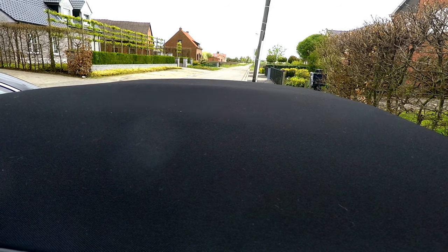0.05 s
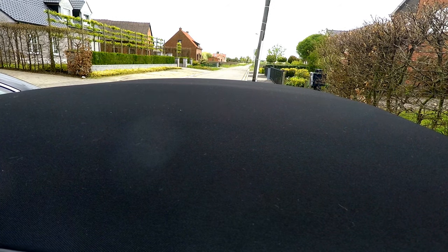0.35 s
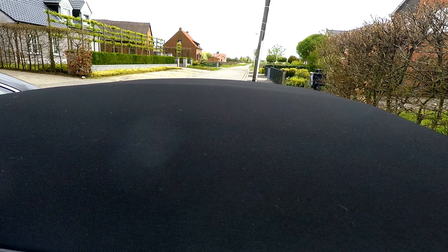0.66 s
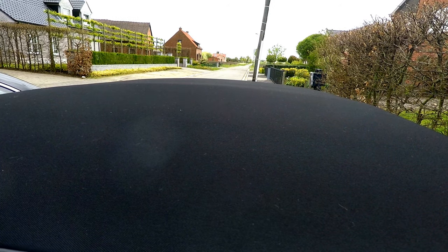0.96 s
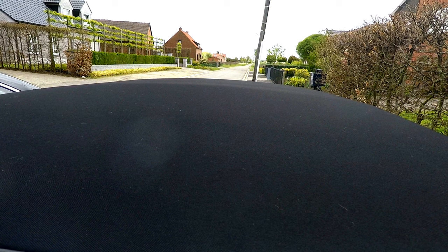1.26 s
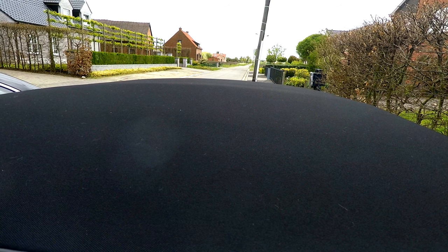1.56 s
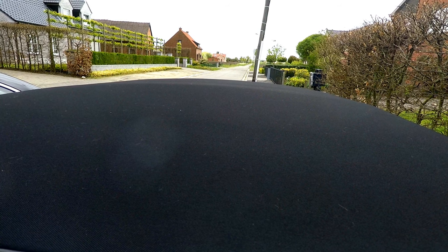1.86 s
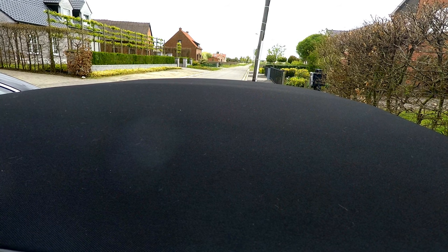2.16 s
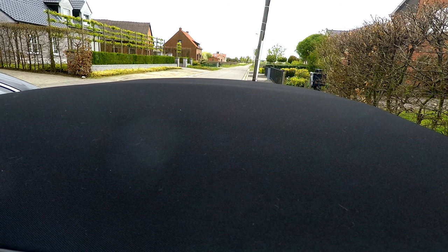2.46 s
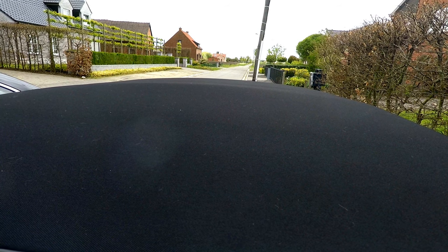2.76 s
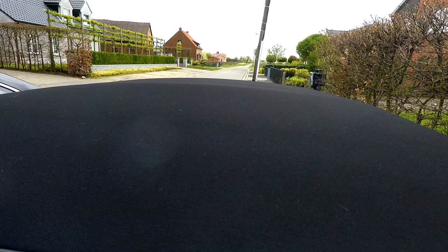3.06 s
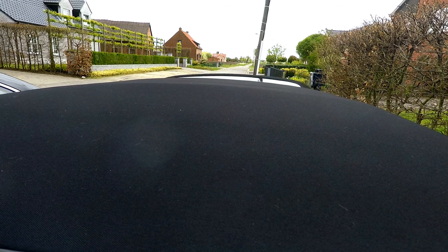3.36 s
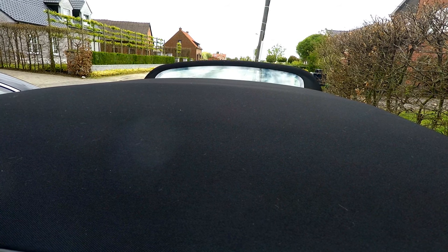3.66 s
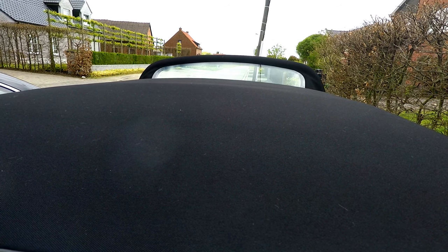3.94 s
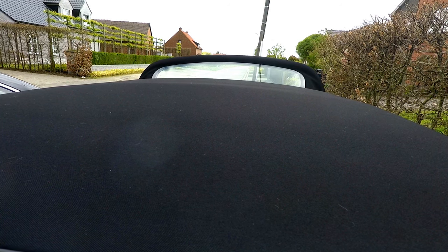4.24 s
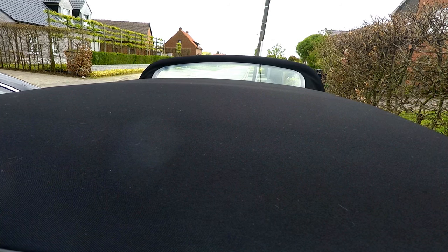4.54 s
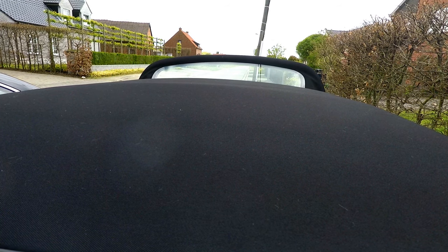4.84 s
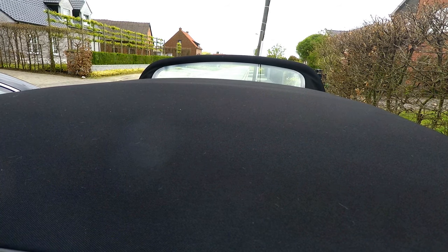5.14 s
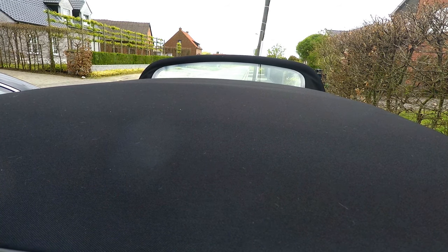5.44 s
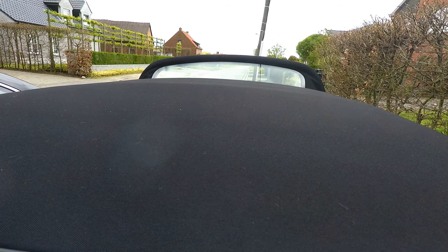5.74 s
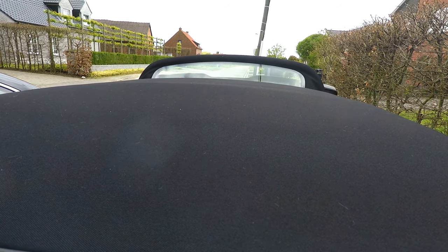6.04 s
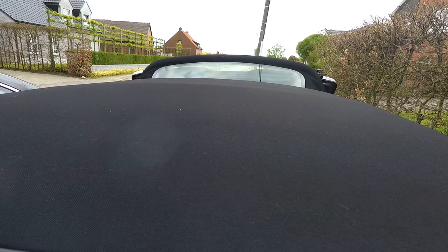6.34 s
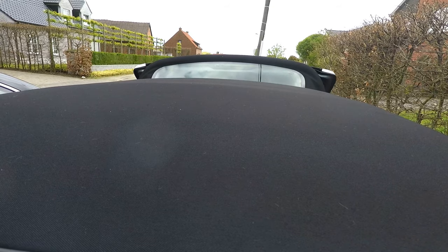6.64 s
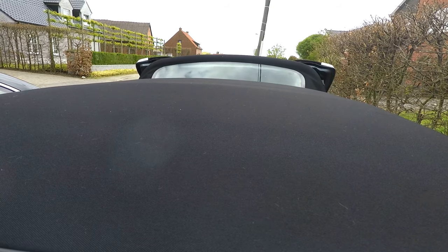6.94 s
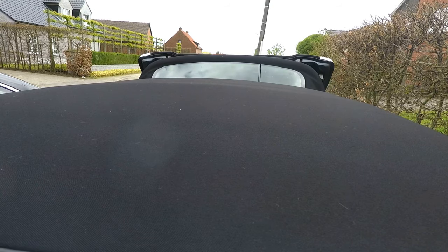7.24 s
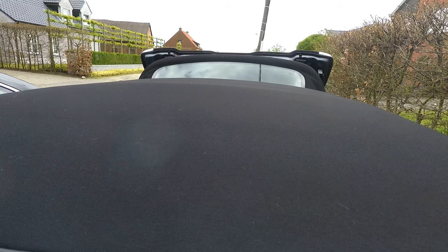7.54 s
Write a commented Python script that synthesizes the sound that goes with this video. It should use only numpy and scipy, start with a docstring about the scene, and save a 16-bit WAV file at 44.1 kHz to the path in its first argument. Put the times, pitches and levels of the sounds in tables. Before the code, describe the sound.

A convertible idles in a quiet street, heard close from its body as a low, pulsing exhaust boom with a steady whirr. The powered soft top unlatches with a sharp snap and heavy thumps, then another thump. Midway the rubber seal peels free with a hiss and short squeak, followed by more clicks and knocks. Light wind buffets the microphone, and small birds chirp in the hedges, with a farther trill near the end.

```python
"""A convertible idles as its powered soft top starts to open, heard from its body in a quiet street.
Close by, the exhaust booms, latches thump the panels and the linkage clicks and knocks; then the roof
peels off its rubber seal with a squeak. A breeze buffets the microphone and small birds sing in the
hedges, echoing off house fronts. The limiter ducks after the first thump and slowly recovers."""
import sys
import numpy as np
from scipy import signal
from scipy.fft import rfft, irfft
from scipy.io import wavfile
from scipy.ndimage import uniform_filter1d

SR = 44100
rng = np.random.default_rng(int(sys.argv[2]) if len(sys.argv) > 2 else 0)


def pcm_store(signal):
    """Save signal as 16-bit PCM."""
    levels = np.round(np.clip(np.atleast_2d(signal), -1, 1) * 32767)
    wavfile.write(sys.argv[1], SR, levels.astype(np.int16).T)


N = 339570
TIME = np.arange(N) / SR

FIRING_HZ = 24.84
# The exhaust boom. Each row: time in seconds, level in dB.
EXHAUST_BOOM = [(0.1, -17.5), (.65, -12), (1.35, -13), (1.9, -21), (2.18, -14), (2.38, -23.5), (2.6, -16.5),
                (2.78, -26.5), (3.55, -24), (4.3, -17.5), (4.8, -20), (5.0, -22.5), (6.08, -27.5),
                (6.26, -22.5), (7.1, -19), (7.7, -22.5)]
# Engine overtones. Each row: multiple of the firing rate, level in dB.
ENGINE_ORDERS = [(2, -33.5), (3, -43.5), (4, -46.5), (5, -42), (5.5, -42.5), (6, -40), (7, -48.5),
                 (7.5, -47.5), (8, -42), (9, -46), (10, -54), (13, -48.5), (16, -50)]
# Fan and pump tones. Each row: pitch in Hz, level in dB.
FAN_AND_PUMP = [(57.5, -43.5), (214.3, -40), (428.6, -46), (926, -57), (1135, -60.5), (1603, -62.5)]


def engine(firings):
    """A four-cylinder idle up close: exhaust pulses boom under wavering overtones, fan and pump."""
    boom_db, = curves(EXHAUST_BOOM)
    # the boom sits to the right, less so as it swells, and drifts slowly further right
    lean_db = -6 + 0.4 * (boom_db + 21.5) - 0.3 * TIME
    sides_db = np.array([lean_db, -lean_db]) / 2
    out = tone(2 * np.pi * firings, lag=0.3) * amp(boom_db + 0.5 * walk(7.6) + sides_db)
    overtones = [(order * FIRING_HZ, db) for order, db in ENGINE_ORDERS]
    for hz, db in [*overtones, *FAN_AND_PUMP]:
        cycles = firings * hz / FIRING_HZ + rng.random()
        phase = 2 * np.pi * cycles + (0.17 + hz / 1500) * walk(12)
        out += tone(phase, lag=hz / 200) * amp(db + 3.07 * walk(6))
    return out


# Pump strokes. Each row: start, rise and settling time in seconds, extra rumble and whirr in dB.
PUMP_STROKES = [(0.19, 0.44, 1.63, 3.5, 3.5), (3.85, 0.19, 2.2, 2.5, 2), (5.6, 0.78, 3, -1, 1)]
# Spectra of the running machinery. Each row: frequency in Hz, relative level in dB.
RUMBLE_SPECTRUM = [(20, -16), (40, -10), (65, 11), (95, 1), (135, 7.5), (180, 8), (240, 7.5), (290, 1.5),
                   (400, -4), (600, -39.5), (9500, -39), (13000, -43)]
WHIRR_SPECTRUM = [(200, -42), (380, 1.5), (540, 2), (700, -1.5), (800, -6.5), (920, -3), (1200, -6.5),
                  (1680, -5.5), (1900, -12.5), (2250, -12), (2900, -17.5), (3800, -17), (5400, -21.5),
                  (6500, -28), (8500, -35), (10500, -32.5), (13000, -99)]


def machinery(firings):
    """Body rumble and a whirr with fine valve ticking pulse with the firings and follow the pump's load."""
    rumble_db, whirr_db = -36, -40
    for start, rise, settle, more_rumble_db, more_whirr_db in PUMP_STROKES:
        age = TIME - start
        load = np.clip(age / rise, 0, 1) * np.exp(-np.maximum(age - rise, 0) / settle)
        rumble_db += more_rumble_db * load
        whirr_db += more_whirr_db * load
    beat = np.cos(2 * np.pi * firings)
    rumble = spread(noise() * amp(0.21 * beat + 2.8 * walk(28)), RUMBLE_SPECTRUM)
    ticking = amp(0.95 * beat + 1.4 * walk(330) + 0.87 * walk(14))
    whirr = spread(noise() * ticking, WHIRR_SPECTRUM)
    return rumble * amp(rumble_db) + whirr * amp(whirr_db)


# Body panel modes. Each row: pitch in Hz, relative level in dB, t60 in seconds, right lag in radians.
PANEL_MODES = [(31, -4, .5, 2), (41.6, -18, .3, -10), (73.3, -9, 0.78, 6.5), (104.5, -8, 0.24, 2.5),
               (137, -3, 0.37, 1.58), (167.4, -3.5, 0.31, 1), (186.7, 1.5, 0.26, 0.96),
               (212, -2.5, 0.26, 1), (235.5, -2.5, 0.25, 1.22), (247.9, -6.5, 0.32, 1),
               (294, -8, 0.12, 2.5), (327.2, -2, 0.13, 1.8), (377, -8.5, 0.13, 2), (462.4, -0.5, 0.13, 3.5),
               (506, -8.5, 0.16, 3.5), (634, -12, 0.11, 3.5), (800, -15, 0.13, -3)]
# Blows of latches and linkage. Each row: start in seconds, peak of the ring in dB,
# most strongly driven pitch in Hz, extra damping per second, contact time in seconds.
BLOWS = [(.146, -1, 514, 28, 0.0022), (.147, -3.5, 60, 4.3, 0.011), (.156, 3.5, 242, 1.6, 0.0054),
         (.19, 6.5, 141, 39, 0.00099), (.229, 2.5, 228, 32, 0.0019), (.264, 5.5, 240, 21, 0.0034),
         (.287, -5, 250, 33, 0.0027), (.398, -24, 430, 9.2, .005), (.495, -18, 207, 7.3, 0.0066),
         (.79, 1.5, 178.5, 12, 0.0069), (.789, -8.5, 620, 35, 0.007), (1.659, -19.5, 215, 3.8, 0.0082),
         (1.74, -18, 240, 2.8, 0.0064), (1.854, -16.5, 250, 12, 0.0043), (2.19, -19, 130, 5, 0.0033),
         (2.43, -21, 138, 9.1, 0.0046), (3.573, -24.5, 179, 8, 0.0055), (3.635, -22.5, 262, 8, 0.0076),
         (4.439, -19, 70, 4.3, 0.005), (4.525, -19, 243, 18, 0.0052), (4.855, -22, 400, 29, 0.0022),
         (4.874, -19, 560, 8, .006), (4.885, -13, 85, 16, .003), (4.886, -4.5, 189, 37, 0.0025),
         (4.945, -15.5, 124, 5.8, 0.0068), (4.988, -13, 206, 17, 0.0038), (5.057, -22, 430, 30, .003),
         (5.064, -16.5, 260, 10, 0.0054), (5.09, -15, 540, 19, .004), (5.093, -5.5, 255, 17, 0.0039)]
# The dull thud of a blow. Each row: frequency in Hz, relative level in dB.
THUD_SPECTRUM = [(40, -0.5), (90, -1), (170, -9.5), (240, 7.5), (330, -0.5), (400, -7.5), (470, -2.5),
                 (560, -12), (700, -21.5), (1200, -34), (2500, -28), (8000, -83)]


def panel_thumps():
    """Each blow rings the panel modes near its own pitch and shakes fabric and trim into a dull thud."""
    out, shake, t = np.zeros((2, N)), np.zeros(N), TIME[:SR // 2]
    mode_hz = np.array(PANEL_MODES)[:, 0]
    modes = np.array([mode(t, hz, db, t60, lag) for hz, db, t60, lag in PANEL_MODES])
    for start, db, hz, damping, contact in BLOWS:
        share = 1 / (1 + (np.log2(mode_hz / hz) / 0.39) ** 2)
        # a padded blow builds up slowly, a hard one at once
        push = (1 - np.exp(-(t / contact) ** 2)) * np.exp(-damping * t)
        ring = np.tensordot(share, modes, 1) * push * (1 - np.exp(-t / 0.0041))
        add(out, start, amp(db) * ring / np.abs(ring).max())
        add(shake, start, amp(db - 17.5) * np.exp(-22 * t) * push)
    return out + spread(noise(), THUD_SPECTRUM) * shake


# The flap of the freed roof: start in seconds, length in seconds, level in dB.
ROOF_FLAP = (0.22, 0.17, -3)


def roof_flap(firings):
    """The loosened roof swings through a few slow, strong cycles at the firing rate."""
    start, length, db = ROOF_FLAP
    return tone(2 * np.pi * firings, lag=.14) * amp(db) * swell(start, length)


# Latch hooks snapping over. Each row: start in seconds, peak in dB.
HOOK_SNAPS = [(.1545, -30), (0.1616, -5.5), (.1945, -22), (.2245, -23), (0.233, -21), (.2362, -23),
              (4.8484, -21), (4.8554, -15), (4.8975, -21), (5.091, -31), (5.1, -24.5), (5.1055, -26),
              (5.361, -25.5)]
# Modes of a hook. Each row: pitch in Hz, relative level in dB, t60 in seconds.
HOOK_MODES = [(720, -5, 0.011), (1130, -4, 0.0096), (1600, -6.5, 0.0081), (2050, -3.5, 0.0089),
              (2920, -3, 0.0057), (3720, 1.5, 0.0081), (4390, -1.5, 0.0064), (5800, -15, .004),
              (7540, -18, .003)]


def latch_hooks():
    """Steel snaps on steel and rings the hook for a few milliseconds, never twice quite alike."""
    out, t = np.zeros((2, N)), TIME[:SR // 20]
    for start, db in HOOK_SNAPS:
        ring = 0
        for hz, mode_db, t60 in HOOK_MODES:
            detune, skew, stray = rng.standard_normal(3)
            ring += mode(t, hz * (1 + 0.041 * detune), mode_db + 0.9 * stray, t60, lag=1.96 * skew)
        ring *= 1 - np.exp(-t / .0003)
        add(out, start, amp(db) * ring / np.abs(ring).max())
    return out


# Cracks of the joints. Each row: start in seconds, level in dB, decay time in seconds.
JOINT_CRACKS = [(.146, -25, .002), (0.154, -21, .002), (.165, -23, 0.013), (0.194, -19.5, 0.0099),
                (0.235, -19.5, 0.004), (0.263, -24, 0.0027), (3.942, -30.5, 0.019), (4.134, -46, .005),
                (4.282, -44, 0.0064), (4.408, -31.5, 0.021), (4.672, -35, 0.024), (4.847, -29, 0.0037),
                (4.8552, -25, .004), (4.882, -33, 0.005), (4.945, -44, .003), (4.971, -35.5, .005),
                (5.059, -31, 0.007), (5.456, -37, .003), (5.603, -33.5, 0.015), (5.931, -38, 0.0037)]
# Their spectrum. Each row: frequency in Hz, relative level in dB.
CRACK_SPECTRUM = [(300, 4), (650, 3.5), (900, 0.5), (1600, 0), (2500, -7), (3100, -10.5), (4000, -9),
                  (5200, -14), (6500, -20.5), (9000, -30), (13000, -49)]


def linkage_clicks():
    """The joints give short gritty cracks, each with a faint rattle behind it."""
    strength, t = np.zeros(N), TIME[:SR // 4]
    rattle = amp(-18) * np.exp(-t / 0.072)
    for start, db, decay in JOINT_CRACKS:
        add(strength, start, amp(db) * (np.exp(-t / decay) + rattle))
    return spread(noise(), CRACK_SPECTRUM) * uniform_filter1d(strength, size=24)


# The seal coming unstuck: start in seconds, level in dB, decay time in seconds.
SEAL_RELEASE = (3.942, -29.5, 0.014)
# Creaks where the rubber grips. Each row: start in seconds, length in seconds, level in dB.
SEAL_CREAKS = [(3.997, 0.092, -35), (4.132, 0.028, -36), (4.201, 0.026, -28), (4.281, 0.028, -30.5),
               (4.395, .04, -45)]
# Spectra of the seal's hiss, rasp and slips. Each row: frequency in Hz, relative level in dB.
HISS_SPECTRUM = [(1500, -30), (2800, -18), (3900, 7), (5000, 0), (6500, -8), (8500, -20), (11000, -34.5),
                 (13000, -50)]
RASP_SPECTRUM = [(500, -23), (850, -16), (1100, 8), (1300, 0), (1550, 13), (1850, -1), (2500, -13),
                 (3250, -12), (4200, -11), (10000, -50)]
SLIP_SPECTRUM = [(400, -32), (700, -4), (900, 5.5), (1080, -9), (1250, 0), (1550, 4.5), (1750, -3),
                 (1950, -2.5), (2750, -11.5), (3500, -4.5), (5000, -9.5), (6500, -19.5), (8000, -27),
                 (10000, -43), (13000, -56)]


def seal_peel():
    """Rubber comes unstuck with a hiss, then lets go in tiny slips and rasping creaks."""
    peel_db, hold_s, fade_db_per_s = -41.5, 0.41, 43
    start, db, decay = SEAL_RELEASE
    release = np.zeros(N)
    add(release, start, amp(db) * np.exp(-TIME / decay) * (1 - np.exp(-TIME / 0.0013)))
    hiss = spread(noise(), HISS_SPECTRUM) * release
    fade_db = fade_db_per_s * np.maximum(TIME - start - hold_s, 0)
    peel = (TIME > start) * amp(peel_db - fade_db + 2.8 * walk(35))
    grip = sum(amp(level) * np.sqrt(swell(onset, length)) for onset, length, level in SEAL_CREAKS)
    rasp = spread(noise() * amp(2.0 * walk(380)), RASP_SPECTRUM)
    slips = spread(noise() * amp(2.3 * walk(420)), SLIP_SPECTRUM)
    return hiss + slips * peel + rasp * grip


# The course of the squeak. Each row: time in seconds, pitch in Hz, level in dB.
SQUEAK_PATH = [(4.118, 1724, -62), (4.137, 1707, -33), (4.155, 1717, -45), (4.186, 1666, -24.5),
               (4.205, 1663, -38), (4.225, 1663, -33), (4.255, 1660, -72), (4.28, 1670, -58),
               (4.293, 1670, -30), (4.325, 1650, -55)]
# Its partials. Each row: ratio to the pitch, relative level in dB.
SQUEAK_PARTIALS = [(1, -1), (1.878, -19), (2.11, -21)]


def seal_squeak():
    """Gripping rubber sings a slightly falling note with uneven overtones."""
    hz, db = curves(SQUEAK_PATH)
    phase = 2 * np.pi * np.cumsum(hz * (1 + 0.0085 * walk(400))) / SR
    sounding = (TIME > SQUEAK_PATH[0][0]) & (TIME < SQUEAK_PATH[-1][0])
    return sounding * sum(tone(ratio * phase, lag=0.84) * amp(db + partial_db + 2.1 * walk(220))
                          for ratio, partial_db in SQUEAK_PARTIALS)


# Modes of a small metal part. Each row: pitch in Hz, level in dB, t60 in seconds.
METAL_MODES = [(1860, -51, .25), (1980, -44.5, 0.46), (2070, -47, 0.5), (3700, -58, 1.8), (7200, -62, .45)]


def metal_ring(start_s=0.99):
    """A loose metal part rings on faintly after the second thump, its close modes beating."""
    out, attack = np.zeros((2, N)), 1 - np.exp(-TIME / .008)
    for hz, db, t60 in METAL_MODES:
        add(out, start_s, mode(TIME, hz, db, t60, lag=2.0) * attack)
    return out


# Gusts. Each row: time of the peak in seconds, half length in seconds, level in dB.
GUSTS = [(0.442, 0.19, -20.5), (1.05, 0.52, -31.5), (2.033, 0.58, -28), (3.06, 0.48, -39),
         (4.78, 0.082, -22.5), (4.976, 0.05, -20)]
# Their spectrum. Each row: frequency in Hz, relative level in dB.
GUST_SPECTRUM = [(15, -35), (32, 2), (42, -2), (65, -8.5), (110, -12.5), (200, -22), (500, -75),
                 (2000, -120)]


def breeze(buffet_db=3.5):
    """Gusts reach the microphone as low, uneven buffeting."""
    strength = sum(amp(db) * np.exp(-((TIME - peak) / half) ** 2) for peak, half, db in GUSTS)
    return spread(noise(), GUST_SPECTRUM) * strength * amp(buffet_db * walk(7.5))


# Bird notes, near and far. Each row: start and length in seconds, pitch in Hz,
# sweep in semitones, level in dB before the shape is applied.
SLIDES = [(1.57, 0.047, 4950, 2.2, -36), (1.757, 0.073, 4910, 7.4, -33.5), (1.93, 0.071, 5020, 4.6, -32),
          (2.1, 0.062, 4910, 4.2, -30), (7.597, .052, 6230, 4.2, -40.5)]
ARCHES = [(2.42, 0.11, 5520, 8.3, -32.5), (2.582, 0.11, 5580, 9.1, -34.5)]
CHIPS = [(1.655, 0.031, 4180, 1, -52), (1.865, 0.0187, 6550, 2, -51), (1.958, 0.024, 4680, -3, -46),
         (2.0, 0.02, 4670, 6, -41.5), (2.06, 0.041, 4520, -1, -50), (2.746, 0.19, 6850, 1.9, -47.5),
         (5.108, 0.03, 4980, -1, -50), (5.124, 0.022, 4570, 4, -45), (5.182, 0.036, 4300, 1, -53),
         (6.052, 0.042, 4040, 4, -46), (6.19, 0.047, 6860, 6, -55), (7.594, .02, 5400, -1, -47),
         (7.636, .02, 5450, 3, -46), (6.26, 0.043, 4020, 4.5, -42), (6.882, .022, 4300, 5.5, -38.5),
         (6.942, .018, 4150, -4, -45)]
HELD_NOTES = [(2.217, 0.061, 4270, 0.082, -36.5), (7.454, 0.093, 4072, -2.2, -36),
              (7.643, 0.035, 6230, 0.1, -42.5)]
FAR_BUZZES = [(2.338, 0.035, 7280, -6.5, -48), (7.305, 0.095, 6990, 3.2, -47.5),
              (7.64, 0.054, 7000, 2, -41)]
FAR_WHISTLES = [(5.895, 0.16, 5360, 0.47, -48.5), (6.39, .13, 7800, 0.7, -59)]
# Note shapes in even steps of time. Each row: pitch offset as a share of the sweep, level offset in dB.
SLIDE_SHAPE = [(1, -20), (0.85, -19), (.68, -16.5), (0.27, -6.5), (0.035, -2), (0.017, -10)]
ARCH_SHAPE = [(-.63, -14), (-.29, 4.5), (0, -11), (-.16, -7), (-.37, 0), (-0.76, -10), (-0.9, -16)]
CHIP_SHAPE = [(0.37, -5.5), (0.051, -0.5), (-0.61, -2)]
HELD_SHAPE = [(0.9, -11), (0.31, -0.5), (0, -2), (0.084, -1), (0, -6)]


def hedge_birds():
    """One bird sings in a near hedge, a little to the right; far buzzes and whistles are mostly echo."""
    kinds = [(SLIDES, SLIDE_SHAPE), (ARCHES, ARCH_SHAPE), (CHIPS, CHIP_SHAPE), (HELD_NOTES, HELD_SHAPE)]
    song = sum(bird_notes(notes, shape, flutter=0.0074) for notes, shape in kinds)
    song *= amp(1.7 * walk(120))
    buzzes = bird_notes(FAR_BUZZES, HELD_SHAPE, flutter=0.026) * amp(2.2 * walk(100))
    whistles = bird_notes(FAR_WHISTLES, HELD_SHAPE, flutter=0.007) * amp(3.5 * walk(75))
    near = pan(song, lean_db=-3.5) + amp(-6.5) * echoes(song, t60=1.0, treble_t60=.3)
    far = buzzes + whistles
    return near + amp(-5.5) * far + amp(-1) * echoes(far, t60=0.73, treble_t60=0.42)


# The two strokes of a trill's first syllable, and their shape. Rows read as for the birds above.
TRILL_STROKES = [(6.563, .043, 4563, 4.9, -43), (6.602, .036, 4525, 3.3, -43.5)]
STROKE_SHAPE = [(0.97, -11), (.62, 0), (.33, -4), (0.067, -2.5), (0.038, 5)]


def far_trill(period_s=.0805, repeats=9):
    """A farther bird repeats two falling strokes; twigs blur them and house fronts ring on longer."""
    strokes = [(start + k * period_s, *rest) for k in range(repeats) for start, *rest in TRILL_STROKES]
    song = bird_notes(strokes, STROKE_SHAPE, flutter=0.009) * amp(2 * walk(100))
    twigs = amp(-2) * echoes(song, t60=0.18, treble_t60=0.27)
    house_fronts = amp(1) * echoes(song, t60=0.64, treble_t60=1.0)
    return song + twigs + house_fronts


def bird_notes(notes, shape, flutter):
    """Whistled notes glide and swell along one shape; a fast flutter of the pitch makes them buzz."""
    out, wobble = np.zeros(N), 1 + flutter * walk(450)
    glide, shape_db = np.transpose(shape)
    for start, length, hz, sweep, db in notes:
        t, steps = TIME[:int(length * SR)], np.linspace(0, length, len(shape))
        pitch = hz * 2 ** (sweep * np.interp(t, steps, glide) / 12)
        pitch = uniform_filter1d(pitch, size=256) * np.interp(start + t, TIME, wobble)
        fades = np.minimum(np.minimum(t, length - t) / 0.009, 1)
        loudness = amp(db + np.interp(t, steps, shape_db)) * fades
        add(out, start, loudness * np.sqrt(2) * np.sin(2 * np.pi * np.cumsum(pitch) / SR))
    return out


def echoes(x, t60, treble_t60, split_hz=4550):
    """Diffuse street reflections, different on each side; the treble has its own decay time."""
    t = TIME[:SR]
    scatter = rng.standard_normal((2, SR)) * (1 - np.exp(-t / 0.0028))
    low = signal.sosfiltfilt(signal.butter(8, split_hz, fs=SR, output="sos"), scatter)
    tail = low * amp(-60 * t / t60) + (scatter - low) * amp(-60 * t / treble_t60)
    return signal.fftconvolve(x[None], unit(tail) / np.sqrt(SR), axes=1)[:, :N]


# Stereo image at the microphone. Each row: frequency in Hz, side minus mid in dB, left minus right in dB.
STEREO_IMAGE = [(58.5, -2, -4.5), (169, -18.5, 7.5), (300, -23, 4), (480, 3, 3), (850, 3, 1.5),
                (1370, -1.5, -4.5), (2500, -1, -1), (4200, -3, 0), (7300, 6, -4), (12000, -3.5, -1.5)]


def spread(pair, spectrum):
    """Colour two unrelated signals and spread them between left and right, at rms 1."""
    colour, = gains(spectrum)
    width, lean = gains(STEREO_IMAGE)
    mid, side = rfft(pair) * colour
    left = (mid + width * side) * lean ** .5
    right = (mid - width * side) / lean ** .5
    return unit(irfft(np.array([left, right]), N))


def pan(x, lean_db):
    """Place a sound; a positive lean is to the left."""
    return x * amp(np.array([[lean_db], [-lean_db]]) / 2)


def tone(phase, lag):
    """A sine of rms 1 whose right side lags by an angle in radians."""
    return np.sqrt(2) * np.sin(phase - np.array([[0], [lag]]))


def mode(t, hz, db, t60, lag):
    """A struck resonance that falls 60 dB in t60 seconds."""
    return tone(2 * np.pi * hz * t, lag) * amp(db - 60 * t / t60)


def noise():
    """Two unrelated white noises."""
    return rng.standard_normal((2, N))


def walk(rate):
    """Random wander with a spread near 1, through `rate` points a second."""
    points = rng.standard_normal(N // 16)
    return np.interp(TIME * rate, np.arange(len(points)), points)


def swell(start, length):
    """A half-sine rise and fall between 0 and 1."""
    return np.sin(np.pi * np.clip((TIME - start) / length, 0, 1))


def curves(table):
    """Each column of a time table, sample by sample."""
    times, *columns = np.transpose(table)
    return [np.interp(TIME, times, column) for column in columns]


def gains(table):
    """Each dB column of a frequency table as a gain per FFT bin."""
    hz, *columns = np.transpose(table)
    log_bin_hz = np.log(np.maximum(np.arange(N // 2 + 1), 1) * SR / N)
    return [amp(np.interp(log_bin_hz, np.log(hz), column)) for column in columns]


def add(out, start_s, sound):
    """Mix a sound in at its start time."""
    first = int(start_s * SR)
    out[..., first:first + sound.shape[-1]] += sound[..., :N - first]


def amp(db):
    """Decibels to gain."""
    return 10 ** (np.asarray(db) / 20)


def unit(x):
    """Scale to rms 1."""
    return x / np.sqrt(np.mean(x ** 2))


def scene():
    """The idling car and its moving roof at the microphone, with the breeze and the birds beyond."""
    firings = np.cumsum(FIRING_HZ * (1 + 0.00202 * walk(3))) / SR  # running count of firing cycles
    roof = panel_thumps() + metal_ring() + roof_flap(firings) + linkage_clicks() + latch_hooks()
    seal = seal_peel() + seal_squeak()
    return engine(firings) + machinery(firings) + roof + seal + breeze() + hedge_birds() + far_trill()


def record(dry):
    """A fast limiter ducks, holds and creeps back; stray peaks are rounded and the top treble is cut."""
    ceiling_db, recovery_db_per_s, hold_s, top_hz = -1, 9.5, .3, 13400
    sensed = uniform_filter1d(np.abs(dry).max(axis=0), size=48)
    over_db = np.maximum(20 * np.log10(np.abs(sensed) + 1e-9) - ceiling_db, 0)
    recovery_db = recovery_db_per_s * TIME
    falling_db = np.maximum.accumulate(over_db + recovery_db) - recovery_db
    held_db = np.minimum(np.maximum.accumulate(over_db), np.interp(TIME - hold_s, TIME, falling_db))
    duck_db = uniform_filter1d(np.maximum(falling_db, held_db), size=128)
    limited = dry * amp(-duck_db)
    rounded = limited / (1 + (limited / .95) ** 6) ** (1 / 6)
    return signal.sosfilt(signal.ellip(8, .2, 70, top_hz, fs=SR, output="sos"), rounded)


dry = scene()
out = record(dry)
pcm_store(out)
```